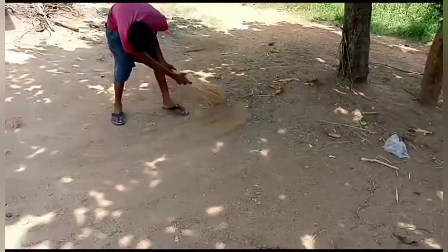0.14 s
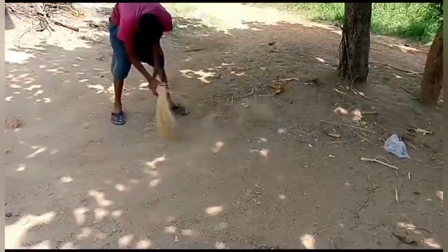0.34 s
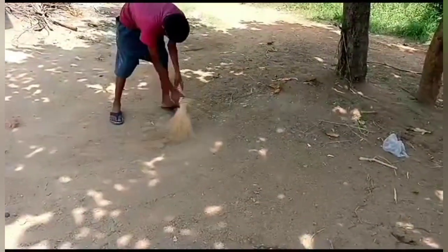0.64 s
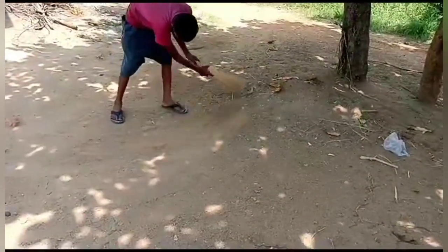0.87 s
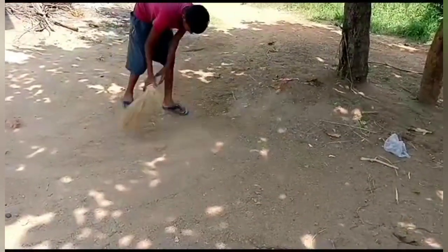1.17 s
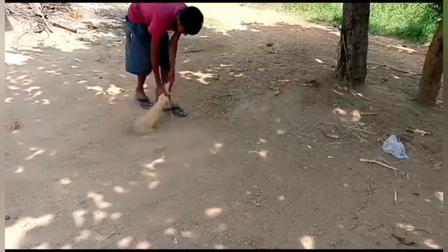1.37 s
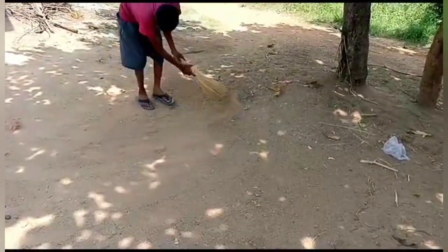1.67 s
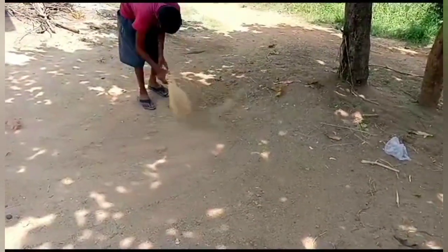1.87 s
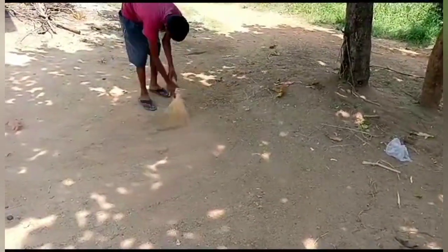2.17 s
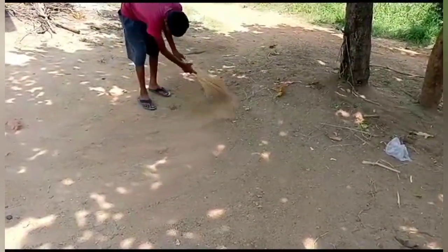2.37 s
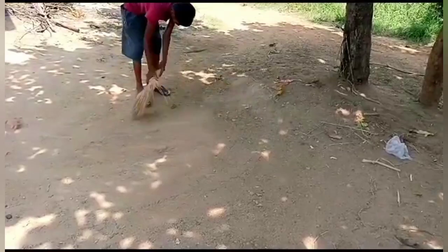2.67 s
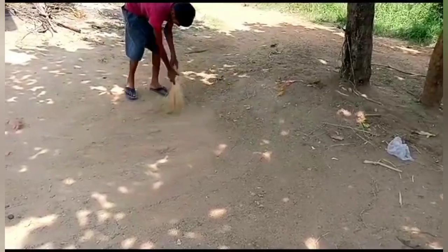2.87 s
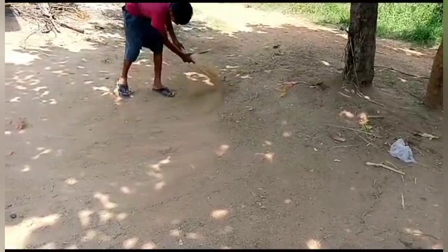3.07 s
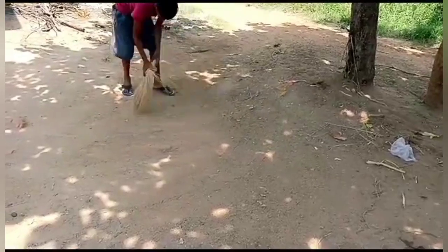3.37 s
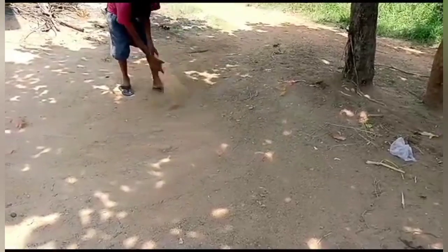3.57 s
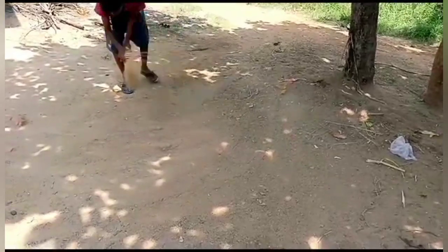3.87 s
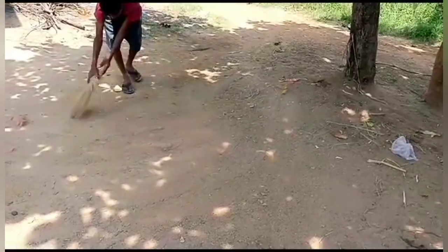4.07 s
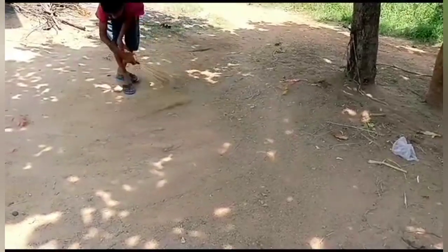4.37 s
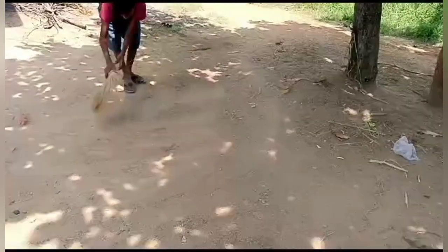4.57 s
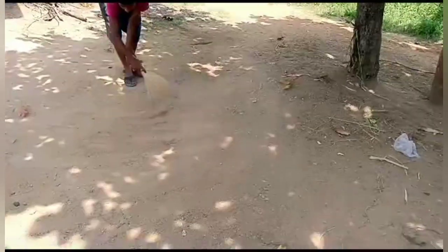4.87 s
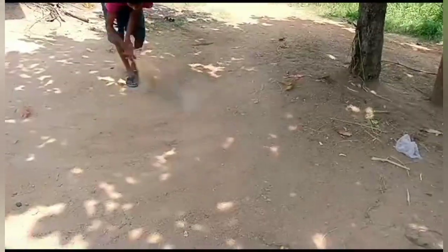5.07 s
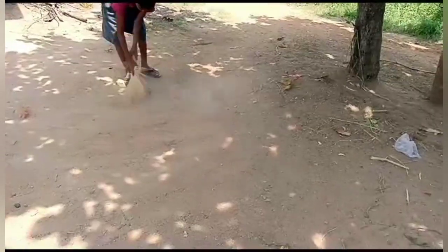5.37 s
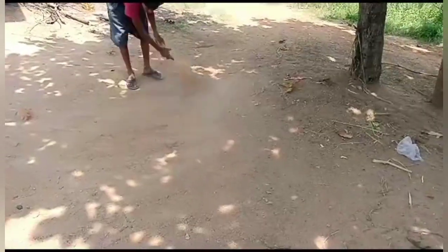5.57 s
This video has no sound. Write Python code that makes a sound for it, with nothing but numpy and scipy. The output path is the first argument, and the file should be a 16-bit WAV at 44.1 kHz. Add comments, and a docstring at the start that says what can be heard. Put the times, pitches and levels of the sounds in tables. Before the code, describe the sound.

A bundle broom sweeps dry dirt in quick, even, hissing strokes under loud shrill cicadas, with twig snaps and sandal crunches early on.

```python
"""Broom bristles hiss at once over a bare dirt yard, under a loud cicada chorus.
Close to a pair of microphone ports, quick strokes of random grain impacts drag sand and throw grit.
Sandals crunch in filtered grains; twigs snap as cracks ringing damped sines; cicadas are click trains
and thin noise bands. Far off, an engine throbs as uneven firings through resonances, and husky tones
hoot now and then. Shaped noise fills the yard, and a light breeze bumps the right port."""
import sys
import numpy as np
from scipy import signal
from scipy.fft import rfft, irfft
from scipy.io import wavfile
from scipy.ndimage import uniform_filter1d

SR = 44100
rng = np.random.default_rng(int(sys.argv[2]) if len(sys.argv) > 2 else 0)


def file_out(sig):
    """Save sig as 16-bit WAV at sys.argv[1]."""
    # one column per channel
    cols = np.atleast_2d(sig).T
    # limit, then scale
    lim = np.clip(cols, -1, 1)
    pcm = np.round(lim * 32767).astype(np.int16)
    wavfile.write(sys.argv[1], SR, pcm)


N = 252244


def gain_of(db):
    """Turns decibels into an amplitude factor."""
    return 10 ** (np.asarray(db) / 20)


def evened(x):
    """Scales a sound to an RMS of 1."""
    return x / np.sqrt(np.mean(x ** 2) + 1e-20)


def smooth_noise(shape, size):
    """Slow random drift: white noise under a moving average along time, at RMS 1."""
    return evened(uniform_filter1d(rng.standard_normal(shape), size=size))


def follow(points, t):
    """Reads a table of (t/s, value) at the times t."""
    return np.interp(t, *np.transpose(points))


def read(points, hz):
    """Reads a table of (f/Hz, value) along a log frequency axis."""
    f, value = np.transpose(points)
    return np.interp(np.log(hz + 1), np.log(f + 1), value)


def add(mix, s, sound):
    """Lays a sound into the mix at s seconds, cut off at the end."""
    part = mix[..., round(s * SR):][..., :sound.shape[-1]]
    part += sound[..., :part.shape[-1]]


def colour(x, points):
    """Filters by a spectrum given in dB."""
    gain = gain_of(read(points, np.fft.rfftfreq(x.shape[-1], 1 / SR)))
    return irfft(rfft(x) * gain, x.shape[-1])


def resonate(x, hz, width):
    """Shifts hz down to zero, smooths, and shifts back: a resonance of gain 1."""
    turn = np.exp(2j * np.pi * np.cumsum(hz * np.ones(x.shape[-1])) / SR)
    r = np.exp(-np.pi * width / SR)
    return 2 * (turn * signal.lfilter([1 - r], [1, -r], x / turn)).real


def flicker(length, depth_db):
    """A gain that wanders over about eleven milliseconds."""
    return gain_of(depth_db * smooth_noise(length, 500))


def ragged(x, depth_db):
    """Uneven contact: small patches of time and pitch catch harder or slip."""
    z = signal.stft(x, nperseg=256, noverlap=192)[2]
    patches = uniform_filter1d(rng.standard_normal(z.shape[1:]), size=2, axis=0)
    patches = evened(uniform_filter1d(patches, size=14, axis=1))
    rough = signal.istft(z * gain_of(depth_db * patches), nperseg=256, noverlap=192)[1]
    return evened(rough[:, :x.shape[-1]])


LAG = 17  # samples by which the left port hears the shared grains late


def grit(length, per_s, spread_db, same):
    """Random grain impacts, a few large, partly shared by both ports."""
    hit = rng.random((length, 3)) < per_s / SR
    size_db = spread_db * np.minimum(rng.exponential(1, (length, 3)), 5)
    size = gain_of(size_db) * rng.standard_normal((length, 3))
    shared, left, right = (hit * size).T
    same = np.clip(same, 0, 1)
    together = np.array([np.roll(shared, LAG), shared])
    return np.sqrt(same) * together + np.sqrt(1 - same) * np.array([left, right])


# Broom strokes close by: (touch-down t/s, rise t/s, hold t/s, lift t/s, effort level/dB,
# sand scrape against fine hiss level/dB, scrape gained per unit of pressing level/dB,
# rolled pebbles level/dB, thrown grit level/dB); scrape and pebbles are given at zero pressing
STROKES = [(0, 0.0013, .002, 0.034, -38.5, -2, 2, -13, -13.5),
           (0.498, 0.12, 0.14, 0.047, -34, -0.5, 2.5, -14.5, -14),
           (1.255, 0.12, 0.13, 0.066, -36, -1, 2.5, -12.5, -21),
           (2.024, 0.1, 0.081, 0.094, -35.5, -3, 2, -14.5, -17.5),
           (2.706, 0.12, 0.1, 0.082, -38.5, -2, 2.5, -14.5, -18),
           (3.362, 0.12, 0.037, .11, -39, 1.5, 3, -13.5, -27),
           (4.001, .09, .14, .05, -38.5, -2, 2, -14.5, -19),
           (4.602, 0.065, 0.073, 0.1, -40, -12.5, 2, -21, -29),
           (5.201, 0.16, 0.11, 0.045, -39, -2.5, 4.5, -13.5, -23)]
# Spectra of fine bristles on dust, dragged sand and rolling pebbles: (f/Hz, relative level/dB per Hz)
BRISTLE_HISS = [(3000, -27), (6000, -33), (9400, -2.5), (12000, 3.5), (15000, 1.5), (16500, 1)]
SAND_SCRAPE = [(1200, -63), (1900, -6), (2450, -5), (3500, 5.5), (5000, 6), (9000, -39)]
PEBBLES = [(500, -19), (950, -12.5), (1300, 2.5), (1900, 3.5), (2600, 11), (4000, -37)]
# The sweeper turns away and the top of the hiss fades: (t/s, tilt at the band edge level/dB)
FACING = [(0, 6), (3, 4), (5.7, -4)]
EDGE_HZ = 15790  # band edge
TOUCH_DB, SAG_DB, LIFT_DB = -16.5, -3, -8.5  # at touch-down, lost over the hold, lost while lifting
LEAVE_S, LEAVE_DB = 0.06, -25  # the last bristles trail off the ground
SETTLE_S, SETTLE_DB = .22, -12  # thrown grit patters down and thins out
CUT_S, CUT_DB = 0.014, -18  # sand stops dragging the moment the tips lift
ROLL_DB = 5  # pebbles grow this much per unit of pressing


def stroke(s, rise, hold, lift, effort_db, weight_db, press_db, pebbles_db, thrown_db):
    """Bristle tips hiss over the dust; pressing down drags sand and rolls pebbles; thrown grit patters."""
    marks = np.cumsum([0, rise, hold, lift, LEAVE_S])
    t = np.arange(0, marks[3] + SETTLE_S, 1 / SR)
    n = len(t)
    pressed = np.interp(t, marks[:4], [-1.9, -1.44, 0.47, 0.091])
    left_db = SAG_DB + LIFT_DB + LEAVE_DB
    levels = [TOUCH_DB, 0, SAG_DB, SAG_DB + LIFT_DB, left_db, 2 * left_db]
    level_db = np.interp(t, [*marks, marks[4] + LEAVE_S], levels)

    hiss = ragged(colour(grit(n, 20000, spread_db=-1.5, same=0.034), BRISTLE_HISS), 3.1)
    hiss = evened(colour(hiss, [(11500, 0), (EDGE_HZ, follow(FACING, s))]))
    scrape = ragged(colour(grit(n, 5000, spread_db=2.1, same=0.37), SAND_SCRAPE), 2.2) * flicker(n, .9)
    pebbles = ragged(colour(grit(n, 1500, spread_db=1.0, same=0.24), PEBBLES), 3.5)
    ground = gain_of(weight_db + press_db * pressed) * scrape
    ground += gain_of(pebbles_db + ROLL_DB * pressed) * pebbles
    ground *= gain_of(np.interp(t, [marks[3], marks[3] + CUT_S], [0, CUT_DB]))

    patter = ragged(colour(grit(n, 1200, spread_db=2.4, same=0.3), SAND_SCRAPE), 4)
    patter = (patter + .8 * hiss) * flicker(n, 1.5)
    patter_db = thrown_db + np.interp(t, [marks[2], marks[3], t[-1]], [-30, 0, SETTLE_DB])
    edges = np.minimum(np.minimum(t / 0.0032, (t[-1] - t) / .04), 1)
    sweep = gain_of(level_db) * (hiss + ground) + gain_of(patter_db) * patter
    return s, gain_of(effort_db) * sweep * edges


# Sandal scuffs near the broom: (loudest t/s, rise t/s, fall t/s, crunch level/dB,
# hollow under the sole f/Hz, low drag f/Hz, low drag against crunch level/dB)
SCUFFS = [(0.195, 0.04, 0.09, -48.5, 2260, 870, -11), (.405, 0.0058, 0.11, -32, 1820, 790, -6.5),
          (0.921, 0.092, 0.16, -46, 2080, 1290, -9), (0.99, 0.0033, 0.068, -45, 2690, 1000, -11.5),
          (1.3, .04, 0.073, -52.5, 2100, 1300, -14), (1.35, 0.032, 0.086, -67.5, 2200, 560, 4),
          (1.95, 0.038, 0.086, -52, 3080, 1170, -5.5), (2.54, 0.039, 0.11, -43, 2330, 694, -16),
          (3.288, 0.03, 0.14, -49.5, 2140, 900, -30), (4.003, 0.014, 0.057, -49.5, 2540, 910, -23),
          (4.326, 0.025, 0.065, -66, 2370, 800, 6.5), (5.679, 0.041, 0.1, -50, 2350, 900, -20)]
# Spectrum of crunching gravel: (f/Hz, relative level/dB per Hz)
GRAVEL = [(1000, -62), (1500, 2.5), (3000, 9.5), (3800, 9.5), (5000, -20.5), (12000, -6.5)]
SET_DB, SLIDE_DB = -14, -34  # level where a scuff begins and where it ends, against its loudest


def scuff(s, rise, fall, top_db, hollow_hz, drag_hz, drag_db):
    """Gravel crunches in clumps, and rings the hollow under a sliding sole."""
    t = np.arange(-rise, fall, 1 / SR)
    n = len(t)
    shape_db = np.where(t < 0, SET_DB * abs(t / rise) ** 1.4, SLIDE_DB * abs(t / fall) ** 1.34)
    grains = grit(n, 3500, spread_db=1.0, same=0.19)
    hollow = evened(resonate(resonate(grains, hollow_hz, 720), hollow_hz, 800))
    crunch = ragged(hollow + 1.8 * evened(colour(grains, GRAVEL)), 2.0) * flicker(n, 0.82)
    drag = evened(resonate(resonate(grains, drag_hz, 580), drag_hz, 580)) * flicker(n, 0.14)
    sound = crunch + gain_of(drag_db) * drag
    return s - rise, gain_of(top_db + shape_db) * sound * signal.windows.tukey(n, .15)


# Twigs and pebbles underfoot: (crackle start t/s, peak level/dB, size as a factor on the modes,
# brightness level/dB per octave)
SNAPS = [(.035, -38, 1.1, 8), (.161, -43, .95, 3), (.1792, -25, 1.1, 9), (.396, -10, 1., 0),
         (.4085, -23, .95, 0), (.4165, -24, 1., 0), (.456, -35, .9, 4), (.7618, -19, 1.2, 8),
         (.7644, -23, 1.1, 18), (.851, -38, 1.05, 5), (.9495, -33, 1., 4), (.98, -23, 1.2, 5),
         (1.291, -39, 1., 8), (1.392, -36, 1.25, 6), (1.972, -39, 1.2, 8), (2.502, -35, 1.1, 8),
         (2.528, -36, 1.1, 8), (3.275, -39, .95, 3), (3.289, -38, 1.02, 8), (3.308, -37, .98, 3),
         (3.329, -37, 1.05, 16), (3.341, -35, 1., 14), (3.994, -39, 1.05, 8), (4.316, -48, .9, -2),
         (5.675, -37, 1.05, 8)]
# Modes of a dry twig: (f/Hz at size 1, level/dB before the brightness tilt, 60 dB decay t/s)
TWIG = [(440, 9, .022), (740, 16, .016), (1650, 18, .009), (2060, 29, .01), (2600, 20, .008),
        (3200, 23, .008), (3800, 25, .009), (10850, 22, .005), (13500, 18, .004)]
TWIG_LAG, TEAR_S = 22, .0008  # samples the left port is late underfoot; fibres tear this long
BOUNCE = 118  # samples from a break to its rebound off the ground
LEAD = 500  # samples of room before the ring


def snap(db, size, bright_db):
    """Cracks over six milliseconds ring a dry twig; the right port is early, and softer if it is bright."""
    t = np.arange(-LEAD, 2000) / SR
    cracks = signal.windows.tukey(260, .4) * np.exp(-np.arange(260) / 200)
    shared, left, right = rng.standard_normal((3, 260)) * cracks
    shared[[60, 60 + BOUNCE]] += 34, 11  # the main break and its bounce
    ring = np.zeros(len(t))
    for hz, mode_db, t60 in TWIG:
        ring += gain_of(mode_db - 60 * t / t60) * np.sin(2 * np.pi * hz * size * t)
    ring *= np.clip(t / TEAR_S, 0, 1)
    # thin twigs lack bass
    ring = colour(ring, [(220, -30 - 4 * bright_db), (400, -3 * bright_db), (1000, -1.6 * bright_db),
                         (1300, -8 - 1.3 * bright_db), (1650, -bright_db), (3000, 0),
                         (4300, .6 * bright_db), (9000, 0)])
    left = np.convolve(shared + left, ring)
    right = gain_of(-.3 * bright_db) * np.convolve(shared + .8 * right, ring)
    pair = np.array([np.pad(left, (TWIG_LAG, 0)), np.pad(right, (0, TWIG_LAG))])
    return gain_of(db) * pair / abs(pair).max()


# Spectrum of the cicadas: (f/Hz, relative level/dB per Hz)
CICADAS = [(2120, -51.5), (3600, -48.5), (4230, -29.5), (4860, -5), (5110, 1), (5680, -1.5), (6510, -16),
           (7760, -16.5), (9350, -29.5), (11800, -29), (13200, -34.5), (15100, -33), (16000, -21)]


def cicadas(count=8, each=4):
    """Near singers click at steady rates; each tree scatters its own group toward both ports."""
    out, fade = np.zeros((2, N)), np.exp(-np.arange(6000) / 1500)
    for _ in range(count):
        drift = 1 + .0018 * smooth_noise((each, N // 64 + 1), 300)
        rates = rng.uniform(90, 260, (each, 1)) * np.repeat(drift, repeats=64, axis=1)[:, :N]
        turns = np.cumsum(rates, axis=1) / SR + rng.random((each, 1))
        clicks = (np.diff(np.floor(turns), axis=1, prepend=0) > 0).sum(axis=0)
        shared, left, right = rng.standard_normal((3, len(fade))) * fade
        scatter = .5 * shared + np.array([left, right])
        out += signal.oaconvolve(clicks[None] - clicks.mean(), scatter)[:, :N]
    return evened(colour(out, CICADAS))


# Single cicadas that stand out as thin bands: (f/Hz, width of the first of two passes f/Hz, level/dB)
SINGERS = [(4890, 76, 6), (5143, 98, 5), (5900, 22, -22), (5660, 53, 5.5), (6760, 16, -6), (7160, 35, -4.5),
           (7070, 30, -23), (8160, 21, -34), (8640, 200, -9)]


def singers():
    """Each loud cicada is a wavering thin band of its own."""
    out = np.zeros((2, N))
    for hz, width, db in SINGERS:
        band = resonate(resonate(rng.standard_normal((2, N)), hz, width), hz, 2 * width)
        out += gain_of(db) * evened(band)
    return evened(out)


# How alike diffuse sound is at the two ports: (f/Hz, left-right likeness)
ALIKE = [(100, 0.12), (300, 0.92), (800, 0.024), (2400, 0.064), (5000, 0.021), (9000, 0.028), (15000, 0.04)]


def field(points, patchy_db):
    """Diffuse stereo noise: random short-time spectra with drifting patches."""
    frames, hz = N // 256 + 5, np.fft.rfftfreq(1024, 1 / SR)
    a, b, c, d, patches = rng.standard_normal((frames, 513, 5)).T
    patches = evened(uniform_filter1d(uniform_filter1d(patches, size=5, axis=0), size=12, axis=1))
    same = np.clip(read(ALIKE, hz), -1, 1)[:, None]
    left = a + 1j * b
    z = np.array([left, same * left + np.sqrt(1 - same ** 2) * (c + 1j * d)])
    z *= gain_of(read(points, hz)[:, None] + patchy_db * patches)
    return evened(signal.istft(z, nperseg=1024, noverlap=768)[1][:, :N])


# Gain over the weighted chorus: (t/s, level/dB)
CHORUS = [(0, -24.5), (3.5, -25), (5.72, -25.5)]


def chorus():
    """Near clicking singers and thin bands stand over the far blur of the same spectrum."""
    parts = 0.72 * cicadas() + 0.33 * singers() + 0.42 * field(CICADAS, patchy_db=5.0)
    return gain_of(follow(CHORUS, np.arange(N) / SR)) * parts


# Breeze on the right port: (middle t/s, f/Hz, peak level/dB)
BUMPS = [(.392, 70, -48), (.697, 125, -27.5)]


def bump(hz, db):
    """One and a half swings of pressure."""
    t = np.arange(-1000, 1000) / SR
    return -gain_of(db) * np.cos(2 * np.pi * hz * t) * np.exp(-(t * hz / 0.8) ** 2)


# Far engine, before its lumps: (t/s, level/dB)
ENGINE = [(0, -91), (1.3, -75), (1.45, -52.5), (1.62, -58.5), (1.75, -58), (2.05, -57), (2.3, -70.5),
          (2.5, -56), (2.75, -70), (2.9, -56.5), (3.52, -56.5), (3.65, -60), (4.13, -54.5), (4.41, -65.5),
          (4.58, -59.5), (5.0, -64.5), (5.35, -63.5), (5.45, -53), (5.64, -65), (5.72, -54)]
# Exhaust pipe resonance: (t/s, f/Hz)
EXHAUST = [(0, 159.4), (4.6, 155), (5.1, 146), (5.72, 145)]
FIRINGS_PER_S, BODY_HZ, EXHAUST_WIDTH = 27.1, 100, 30  # mean rate, Hz, Hz in the first pass


def engine():
    """Uneven firings ring an exhaust pipe and engine body far away; the air makes it come in lumps."""
    t = np.arange(N) / SR
    level_db, pipe_hz = follow(ENGINE, t), follow(EXHAUST, t)
    lumps = evened(uniform_filter1d(uniform_filter1d(rng.standard_normal(N), size=2500), size=2500))
    turns = np.cumsum(FIRINGS_PER_S * (1 + 0.0084 * smooth_noise(N, 8000))) / SR
    strength = gain_of(3.6 * np.clip(rng.standard_normal(N), -2, 1.2))
    firings = (np.diff(np.floor(turns), prepend=0) > 0) * strength
    # one pass runs backwards: distance blurs both ends of a throb
    pipe = resonate(firings, pipe_hz, EXHAUST_WIDTH)
    pipe = evened(resonate(pipe[::-1], pipe_hz[::-1], 36)[::-1])
    rumble = evened(resonate(resonate(rng.standard_normal(N), pipe_hz, 55), pipe_hz, 59))  # scattered
    body = evened(resonate(resonate(firings, BODY_HZ, 70), BODY_HZ, 72))
    return gain_of(level_db + 2.4 * lumps) * evened(pipe + 1.03 * rumble + 0.36 * body)


# Soft far hoots, perhaps a dove: (t/s, length t/s, first f/Hz, last f/Hz, level/dB)
HOOTS = [(0.277, 0.12, 334.5, 350, -58.5), (1.036, 0.073, 347, 341, -72), (3.326, 0.078, 362, 327, -67),
         (4.55, 0.26, 510, 470, -71.5), (4.816, 0.097, 322, 339, -60), (5.169, 0.06, 321, 321, -67)]


def hoot(length, first_hz, last_hz, db):
    """A husky tone that swells and fades, broken up by distance."""
    hz = np.linspace(first_hz, last_hz, round(length * SR))
    husk = evened(resonate(resonate(rng.standard_normal(len(hz)), hz, 37), hz, 60))
    tone = np.sqrt(2) * np.sin(2 * np.pi * np.cumsum(hz) / SR)
    return gain_of(db) * (0.91 * tone + 0.51 * husk) * signal.windows.tukey(len(hz), .6)


# Spectrum of the yard's background: (f/Hz, relative level/dB per Hz)
YARD = [(18, -50), (40, -57), (85, -11.5), (200, -12.5), (290, -18.5), (340, -15.5), (420, -24.5),
        (850, -29.5), (1300, -37), (2100, -20), (3200, -33.5), (4200, -1), (6000, -78)]
# Loudness of that background: (t/s, level/dB)
YARD_DB = [(0, -54), (3, -56), (5.72, -57)]


def yard():
    """A soft diffuse noise lies under everything and slowly sinks."""
    return gain_of(follow(YARD_DB, np.arange(N) / SR)) * field(YARD, patchy_db=5.0)


def scene():
    """Lays strokes, scuffs, snaps, bumps and hoots over the chorus, yard and engine."""
    mix = chorus() + yard() + engine()
    for row in STROKES:
        add(mix, *stroke(*row))
    for row in SCUFFS:
        add(mix, *scuff(*row))
    for s, *crack in SNAPS:
        add(mix, s - LEAD / SR, snap(*crack))
    for s, hz, db in BUMPS:
        add(mix[1], s - 1000 / SR, bump(hz, db))
    for s, *call in HOOTS:
        add(mix, s, hoot(*call))
    return mix


# Balance of the microphone ports: (f/Hz, left over right level/dB)
PORTS = [(40, -11), (160, 4), (900, -1), (2400, 2), (3600, 6), (5300, 4.5), (6500, -5.5), (8300, -4.5),
         (10000, 5.5), (13000, 6.5), (15000, 8.5)]


def record(dry):
    """The two ports weigh each frequency differently; then a low-pass sets the band limit."""
    lean = gain_of(read(PORTS, np.fft.rfftfreq(N, 1 / SR)) / 2)
    ports = irfft(rfft(dry) * np.array([lean, 1 / lean]), N)
    band_limit = signal.firwin(1501, EDGE_HZ, window=("kaiser", 9), fs=SR)
    return signal.oaconvolve(ports, band_limit[None], "same")


dry = scene()
out = record(dry)
file_out(out)
```